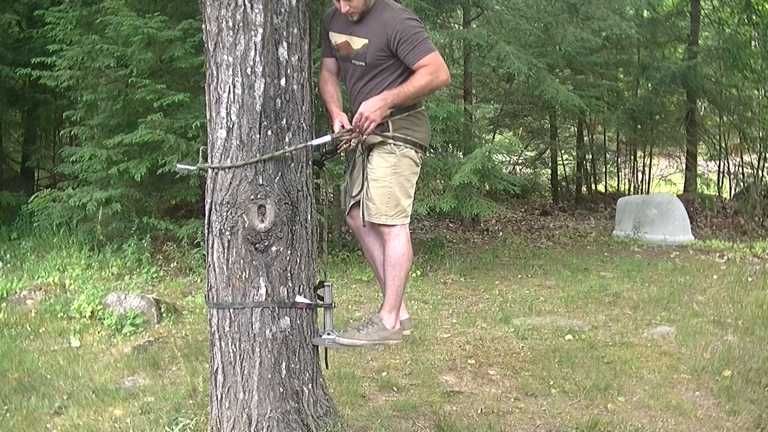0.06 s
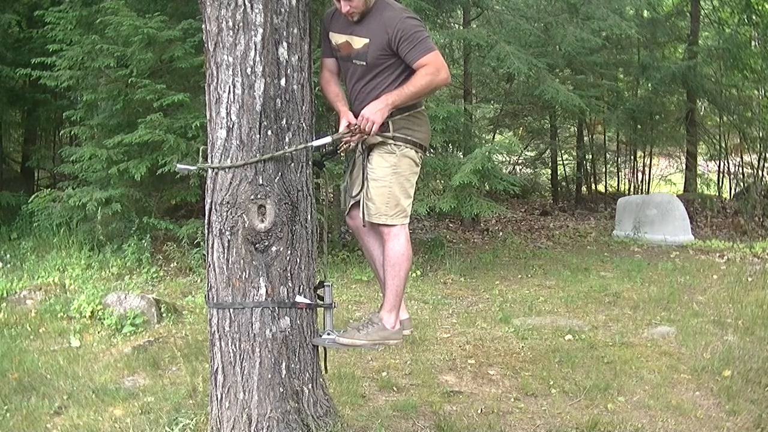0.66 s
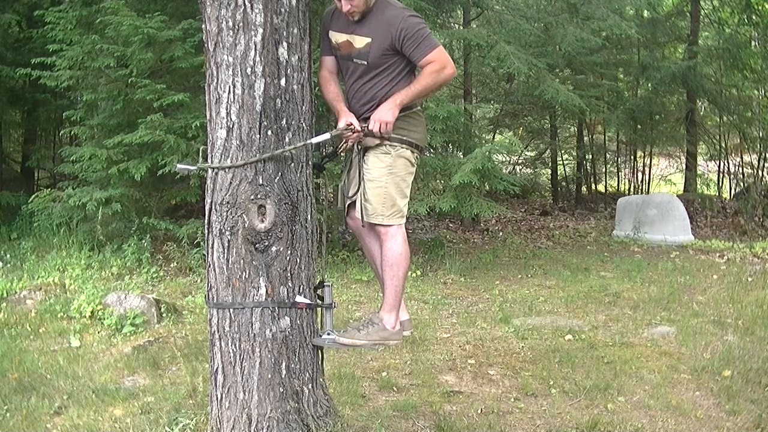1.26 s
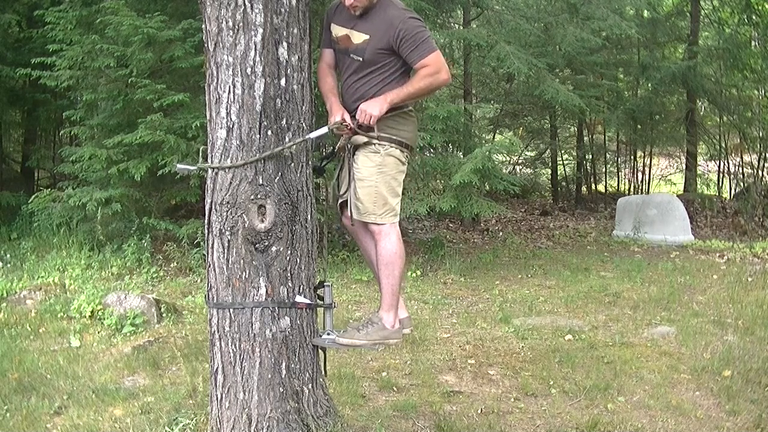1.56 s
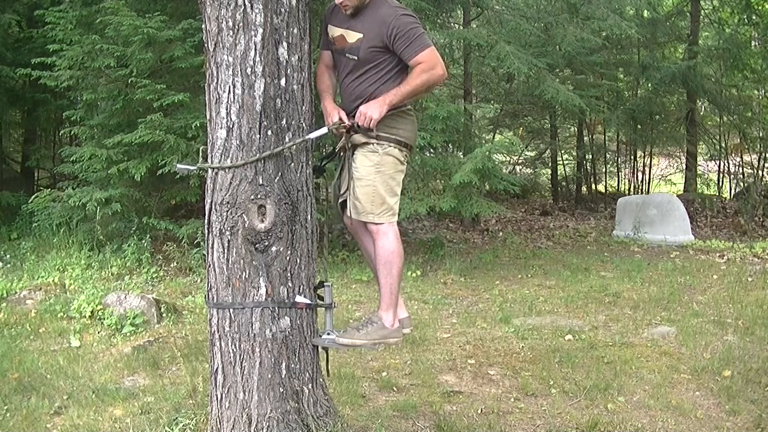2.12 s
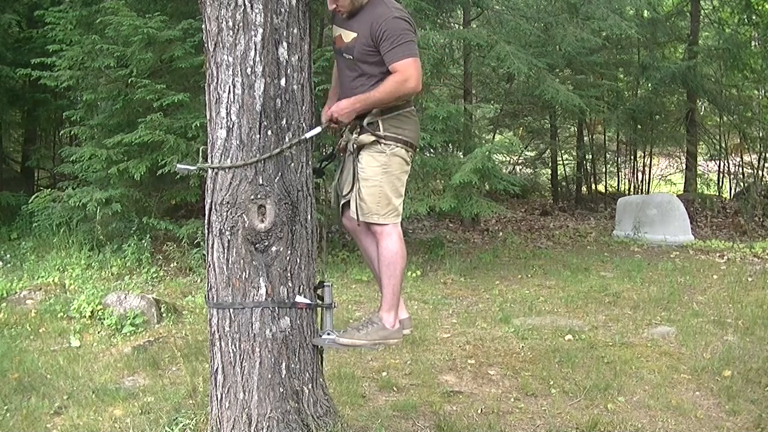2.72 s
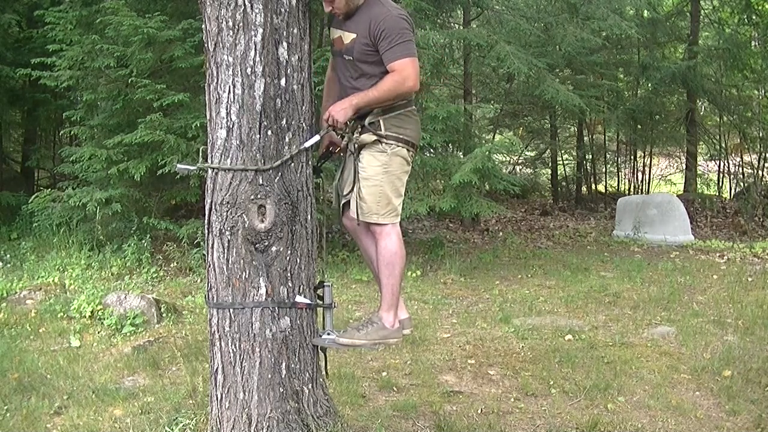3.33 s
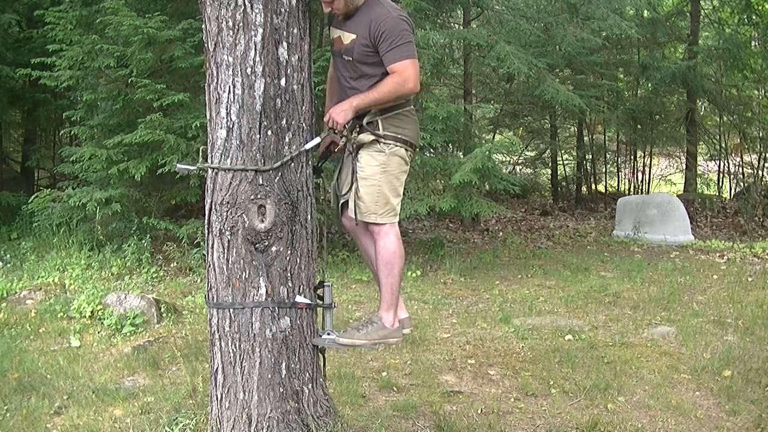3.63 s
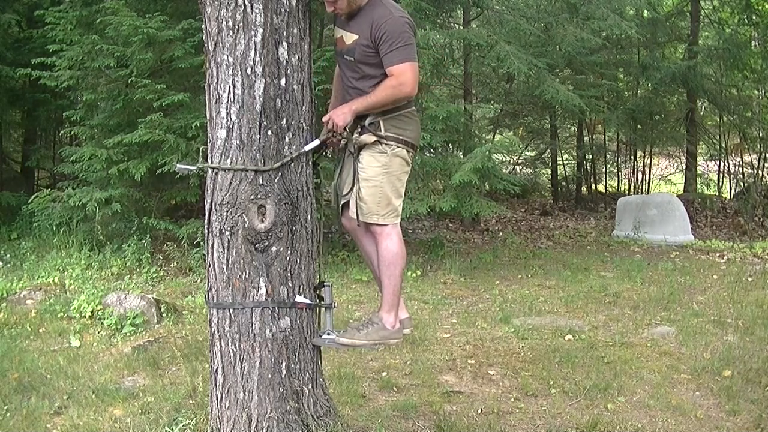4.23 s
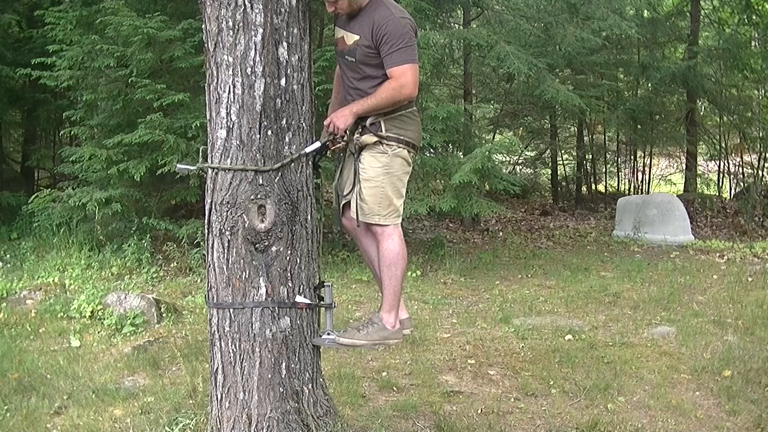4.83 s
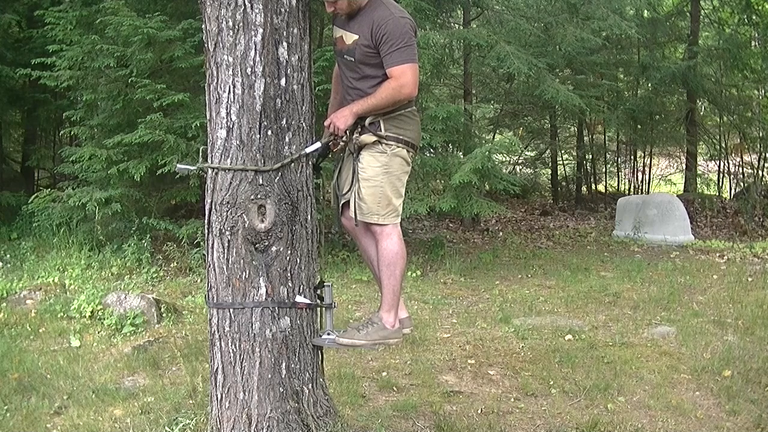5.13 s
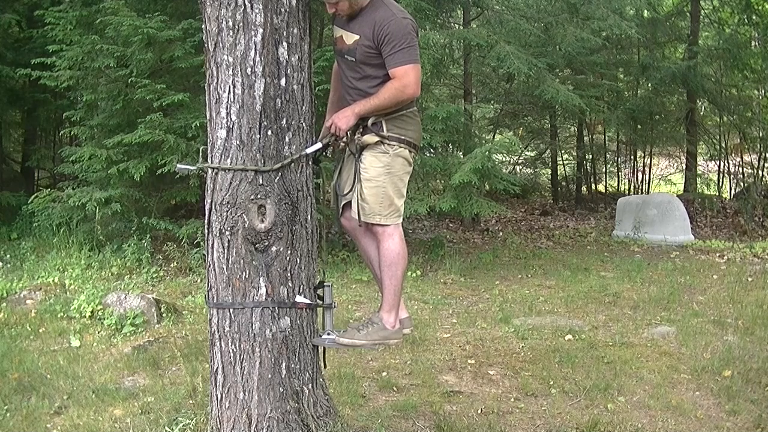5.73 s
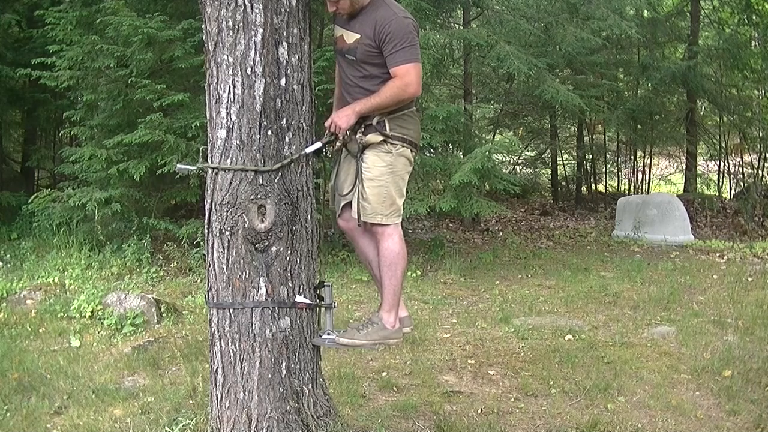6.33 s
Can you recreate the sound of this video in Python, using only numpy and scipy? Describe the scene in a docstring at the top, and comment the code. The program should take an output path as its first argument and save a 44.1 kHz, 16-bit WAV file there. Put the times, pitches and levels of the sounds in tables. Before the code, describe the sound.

A songbird whistles short phrases in quiet woods while nearby climbing gear clinks, rope rustles faintly and a carabiner snaps shut once.

```python
"""A songbird whistles short slurred phrases in the woods; the trees smear each one into a long tail.
Every syllable is one nearly pure tone arching in pitch. Nearby a climber handles a rope and harness:
fibres rustle, a knot creaks, buckles clink, and a carabiner's sprung gate snaps shut once.
Underneath lie a steady hush of air and the faint ticks of a camera's focus motor. A low rumble swells
now and then, partly around the motor's jolts, and there is one soft low thud."""
import sys
import numpy as np
from scipy import signal
from scipy.fft import rfft, irfft, next_fast_len
from scipy.io import wavfile

SR = 44100
rng = np.random.default_rng(int(sys.argv[2]) if len(sys.argv) > 2 else 0)


def inscribe(sig):
    """Save sig as 16-bit PCM at rate SR to the path in sys.argv[1].

    A 1-D sig is mono; a 2-D sig holds one channel per row.
    Samples are clipped to [-1, 1] before scaling.
    """
    pcm = np.round(np.clip(np.atleast_2d(sig).T, -1, 1) * 32767)
    wavfile.write(sys.argv[1], SR, pcm.astype(np.int16))


N = 285327
TIME = np.arange(N) / SR

# steady hush of air: frequency_hz, density_db
HUSH_COLOUR = [(15, -40), (25, -21), (70, -9.5), (117, -3.5), (180, -1.5), (293, -2), (775, -13),
               (863, -11.5), (1130, -14), (2410, -7), (2910, -6.5), (3720, -6), (5570, -12), (14800, -21),
               (16000, -38.5)]
# low rumble and thud: frequency_hz, density_db
RUMBLE_COLOUR = [(70, -20.5), (150, -3), (260, -1), (380, -2.5), (650, -31)]
# rumble swells, some around the motor's jolts, and the thud at 5.06 s: middle_s, level_db, half_length_s
RUMBLE_SWELLS = [(0.615, -71, .08), (1.65, -70, 0.21), (2.376, -73.5, 0.3), (3.667, -67, 0.16),
                 (5.06, -62.5, 0.066), (6.19, -69, 0.29)]
# stereo image of diffuse noise: frequency_hz, left_right_correlation
STEREO_LIKENESS = [(50, -0.34), (250, -0.26), (600, -0.43), (1200, -0.37), (3000, 0.27), (7000, 0.11),
                   (15000, 0.19)]
# stretches when the focus motor runs: start_s, end_s
MOTOR_RUNS = [(1.3895, 2.54), (6.028, 6.45)]
# jolts of the lens: start_s, relative_db
LENS_JOLTS = [(1.39, -58), (1.661, -52), (1.928, -54), (2.061, -51.5), (2.325, -51), (2.394, -52),
              (6.064, -54), (6.131, -52), (6.463, -50.5)]
# camera body answering a motor step: centre_hz, width_hz, gain_db
STEP_RESONANCES = [(474, 270, -3), (782, 64, 3.5), (1210, 360, -8.5), (1940, 52, 6.5)]
# camera body answering a jolt: centre_hz, width_hz, gain_db
JOLT_RESONANCES = [(248, 107, 13), (426, 47, -6), (617, 43, 11), (1040, 120, 2), (1260, 110, -3),
                   (1900, 70, 11)]
# rope sliding through the hands: time_s, relative_db
RUSTLE_ENVELOPE = [(0.0, -66), (1.3, -63.5), (1.96, -72), (2.43, -61), (2.94, -65), (3.37, -59.5),
                   (3.78, -66), (4.31, -62), (6.47, -78)]
# rubbing fibres: frequency_hz, density_db
FIBRE_COLOUR = [(1200, -4), (2200, 9), (3500, -13), (6500, 9), (9000, -3), (15000, -14)]
# rope creaking in its knot: start_s, level_db, pitch_hz, length_s
KNOT_CREAKS = [(3.995, -51.5, 2090, 0.0058), (4.171, -54, 2210, 0.011), (5.625, -60, 1950, 0.016),
               (5.9503, -49, 1940, 0.0071), (5.951, -54, 1530, 0.0046), (5.984, -53, 2030, .016)]
# dry crack of metal on metal: frequency_hz, density_db
CRACK_COLOUR = [(100, -40), (600, -26), (1250, -19), (2100, 3), (4000, 4), (8000, 6), (10000, -1.5),
                (13000, -5), (15500, -10)]
# buckles and links touching: start_s, crack_db, ring_db, rebound_db, main_mode_hz, second_mode_hz
BUCKLE_CLINKS = [(.091, -49, -39.5, -15, 2340, 2940), (.3866, -44, -49, -13, 8500, 5900),
                 (1.1552, -30.5, -24.5, -20, 4020, 3620), (3.9962, -34.5, -38, -12, 3900, 8050),
                 (4.1725, -42.5, -38.5, -10, 2170, 6170), (4.4141, -28.5, -37, -3.5, 7550, 4200),
                 (5.1129, -43, -47, -6, 6780, 4200), (5.1886, -31.5, -30, -11, 4450, 8400),
                 (5.214, -41.5, -42, -15, 7900, 4270), (6.3885, -41, -40, -12, 4300, 6750)]
# the carabiner's gate grazes, then slams home: start_s, crack_db, ring_db
GATE_HITS = [(2.3509, -27, -22.5), (2.356, -17, -17.5)]
# ring of the carabiner: pitch_hz, relative_db, t60_s
CARABINER_MODES = [(2050, -14.5, 0.0099), (3100, -19, 0.018), (4460, -3.5, 0.029), (4610, -1, 0.016),
                   (4530, -8, 0.03), (4990, -14.5, 0.038), (6600, -11, 0.023), (7340, 0.5, 0.036),
                   (7100, -29, 0.23), (7800, -9, 0.025), (8380, -7, 0.026), (9260, -17.5, 0.051),
                   (14600, -23, 0.054)]
# syllables of the song, one pitch arch each: crest_s, level_db, start_hz, crest_hz, end_hz, rise_s, fall_s
SYLLABLES = [(.194, -56, 3650, 4330, 2476, .05, 0.091), (.364, -49.5, 2480, 3834, 3230, .059, .042),
             (1.143, -58.5, 2700, 3990, 2375, .046, 0.055), (1.323, -53, 2600, 3527, 2503, .056, 0.025),
             (2.338, -61.5, 2900, 5290, 4250, .081, 0.089), (2.5, -55, 3390, 4790, 4710, .119, 0.029),
             (2.566, -53, 3350, 3360, 2570, .01, .018), (2.644, -52, 2650, 3300, 2420, .06, 0.03),
             (2.697, -61, 2506, 2600, 2270, .015, .02), (2.933, -60.5, 3200, 3230, 2530, .005, 0.068),
             (3.115, -61.5, 2400, 3005, 2210, .037, .035), (3.428, -54.5, 4100, 4100, 2613, .004, 0.053),
             (3.448, -66, 4300, 4980, 4400, .066, 0.044), (3.556, -51, 2650, 3766, 3026, .059, .025),
             (4.548, -57, 3750, 3760, 2900, .005, 0.048), (4.614, -55.5, 2606, 3740, 2410, .029, 0.058),
             (4.642, -63.5, 3730, 4250, 4220, .054, .014), (4.756, -54, 2650, 3105, 2550, .052, 0.028),
             (5.166, -61, 3510, 3580, 2230, .007, .082), (5.361, -61.5, 2250, 3390, 3340, .06, .015),
             (5.581, -63, 4830, 5980, 4570, .004, .027), (5.607, -56.5, 3700, 4136, 2817, .01, .03),
             (5.716, -60, 3150, 4950, 4600, .081, .01), (6.274, -55.5, 2550, 3610, 2840, .028, .013),
             (6.306, -58, 2746, 2890, 2320, .032, 0.038), (6.416, -57, 3600, 3660, 2480, .008, 0.026),
             (6.475, -51.5, 2500, 3400, 3300, .03, .01)]


def from_db(db):
    return 10 ** (np.asarray(db) / 20)


def unit_rms(x):
    return x / np.sqrt(np.mean(x ** 2) + 1e-20)


def at_hz(points, hz):
    """Reads a curve on a log-frequency axis."""
    knots_hz, values = np.transpose(points)
    return np.interp(np.log(hz + 1), np.log(knots_hz), values)


def drift(rate_hz):
    """A random modulator with a spread of about 1."""
    knots = rng.standard_normal(8000)
    return 1.2 * np.interp(TIME * rate_hz, np.arange(len(knots)), knots)


def coloured(x, spectrum, size=1024):
    """Minimum-phase EQ: no ring ahead of a hit, and white noise keeps its power."""
    gain = unit_rms(from_db(at_hz(spectrum, np.fft.rfftfreq(size, 1 / SR))))
    cepstrum = irfft(np.log(gain))
    cepstrum[1:size // 2] *= 2
    cepstrum[size // 2 + 1:] = 0
    return signal.fftconvolve(x, irfft(np.exp(rfft(cepstrum))))[:N]


def left_right(mid, side, alike):
    """Mid and side to stereo: alike = 1 is mono, 0 is wide."""
    return np.sqrt(1 + alike) * mid + np.sqrt(1 - alike) * side * [[1], [-1]]


def panned(x, left_db):
    return x * from_db(np.array([[left_db], [-left_db]]) / 2)


def stereo_noise(spectrum):
    """A diffuse bed of coloured noise at rms 1."""
    size = next_fast_len(N)
    hz = np.fft.rfftfreq(size, 1 / SR)
    mid, side = rfft(rng.standard_normal((2, size)))
    white = left_right(mid, side, at_hz(STEREO_LIKENESS, hz))
    return unit_rms(irfft(white * from_db(at_hz(spectrum, hz)), size)[:, :N])


def resonances(x, modes):
    """A resonant body as parallel band-passes."""
    return sum(from_db(db) * signal.lfilter(*signal.iirpeak(hz, hz / width_hz, SR), x)
               for hz, width_hz, db in modes)


def clicks(rows):
    """One impulse for each start_s, level_db."""
    out = np.zeros(N)
    for start_s, db in rows:
        out[min(round(start_s * SR), N - 1)] += from_db(db)
    return out


def chafe(hits, t60_s):
    """Each hit sets off a short dying burst of noise."""
    envelope = signal.lfilter([1], [1, -from_db(-60 / (t60_s * SR))], hits + 1e-18)
    return envelope * rng.standard_normal(N)


def struck(modes, contact_s=0.00045):
    """Struck metal: its modes swell during the contact, then ring out."""
    t = TIME[:SR // 2]
    ring = sum(from_db(db - 60 * t / t60_s) * np.sin(2 * np.pi * (hz * t + rng.random()))
               for hz, db, t60_s in modes)
    return ring * (1 - np.exp(-t / contact_s))


def add(out, start_s, sound):
    part = out[round(start_s * SR):][:len(sound)]
    part += sound[:len(part)]


def scatter(x, t60_s, build_s, alike):
    """Forest reverb at unit power: echoes off trunks, leaves and ground build up and die away."""
    t = TIME[:SR * 3 // 2]
    mid, side = rng.standard_normal((2, len(t)))
    echoes = left_right(mid, side, alike) * (1 - np.exp(-t / build_s)) * from_db(-60 * t / t60_s)
    echoes /= np.sqrt(np.sum(echoes ** 2) / 2)
    return signal.fftconvolve(x[None], echoes, axes=1)[:, :N]


def air(level_db=-57):
    """The bed: a steady hush of air and leaves."""
    return from_db(level_db) * stereo_noise(HUSH_COLOUR)


def low_rumble(floor_db=-69):
    """Low noise swells, partly around the focus motor's jolts; its shortest swell is a soft thud."""
    swells = sum(from_db(db) * np.exp(-((TIME - middle_s) / half_s) ** 2)
                 for middle_s, db, half_s in RUMBLE_SWELLS)
    return (from_db(floor_db) + swells) * stereo_noise(RUMBLE_COLOUR)


def focus_motor(step_rate_hz=29.97, tap_db=-27.5, hiss_db=-42, jolt_gain_db=12):
    """The lens ticks along in even steps and now and then jolts; both ring the camera body."""
    steps = clicks((s, 0) for start_s, end_s in MOTOR_RUNS
                   for s in np.arange(start_s, end_s, 1 / step_rate_hz))
    jolts = from_db(jolt_gain_db) * clicks(LENS_JOLTS)
    channels = []
    for _ in range(2):   # the taps sit in the centre; each side has its own noise
        ticks = from_db(tap_db) * steps + from_db(hiss_db) * chafe(steps, t60_s=0.024)
        knocks = chafe(jolts, t60_s=0.045)
        channels.append(resonances(ticks, STEP_RESONANCES) + resonances(knocks, JOLT_RESONANCES))
    return np.array(channels)


def rope_rustle(trim_db=-8.5, grain_db=3.5):
    """Rope fibres and cloth rub in uneven clumps."""
    envelope_db = np.interp(TIME, *np.transpose(RUSTLE_ENVELOPE))
    return from_db(envelope_db + trim_db + grain_db * drift(150)) * stereo_noise(FIBRE_COLOUR)


def knot_creaks(sag=0.018, roughness=0.037):
    """The tight rope slips in short, rough squeaks that sink slightly in pitch."""
    out = np.zeros(N)
    wobble = 1 + roughness * drift(600)
    for start_s, db, hz, length_s in KNOT_CREAKS:
        progress = (TIME - start_s) / length_s
        span = (progress > 0) & (progress < 1)
        pitch_hz = hz * (1 - sag * (progress[span] - .5)) * wobble[span]
        envelope = from_db(db) * np.sin(np.pi * progress[span])
        out[span] += envelope * np.sin(2 * np.pi * np.cumsum(pitch_hz) / SR)
    return out


def buckle_clinks(rebound_s=0.0035, ring_t60_s=0.0066, second_mode_db=-4, chafe_db=-9):
    """Small metal parts, damped by the hand, touch, rebound once and ring briefly in two modes."""
    touches = [(start_s + delay_s, crack_db + drop_db, ring_db + drop_db, main_hz, second_hz)
               for start_s, crack_db, ring_db, rebound_db, main_hz, second_hz in BUCKLE_CLINKS
               for delay_s, drop_db in ((0, 0), (rebound_s, rebound_db))]
    hits = clicks(touch[:2] for touch in touches)
    out = coloured(hits + from_db(chafe_db) * chafe(hits, t60_s=0.016), CRACK_COLOUR)
    for start_s, _, ring_db, main_hz, second_hz in touches:
        modes = [(main_hz, ring_db, ring_t60_s), (second_hz, ring_db + second_mode_db, ring_t60_s)]
        add(out, start_s, struck(modes))
    return out


def carabiner_snap(click_db=9, chafe_db=-3):
    """The sprung gate hits the carabiner: a gritty crack and a bright metal ring."""
    hits = clicks(hit[:2] for hit in GATE_HITS)
    crack = from_db(click_db) * hits + from_db(chafe_db) * chafe(hits, t60_s=.014)
    out = coloured(crack, CRACK_COLOUR)
    for start_s, _, ring_db in GATE_HITS:
        add(out, start_s, from_db(ring_db) * struck(CARABINER_MODES))
    return out


def whistle(syllable, attack_s=.018, release_s=0.0099, ease=.85, tremble=0.011, ends_lift_db=1.5):
    """One nearly pure tone slurs up to a round crest and down again, with a slight tremble."""
    crest_s, db, start_hz, crest_hz, end_hz, rise_s, fall_s = syllable
    span = (TIME > crest_s - rise_s) & (TIME < crest_s + fall_s + release_s)
    t = TIME[span] - crest_s
    turn = np.pi / 2 * ease   # at ease = 1 the slur levels out fully at its low ends
    from_crest = np.clip([-t / rise_s, t / fall_s], 0, 1)
    to_start, to_end = (np.sin(turn * from_crest) / np.sin(turn)) ** 2
    arch_hz = crest_hz + (start_hz - crest_hz) * to_start + (end_hz - crest_hz) * to_end
    pitch_hz = arch_hz * (1 + tremble * drift(300)[span])
    envelope = np.clip(np.minimum((t + rise_s) / attack_s, 1 - (t - fall_s) / release_s), 0, 1)
    amplitude = np.sqrt(2) * from_db(db + ends_lift_db * (to_start + to_end))
    out = np.zeros(N)
    out[span] = envelope * amplitude * np.sin(2 * np.pi * np.cumsum(pitch_hz) / SR)
    return out


def songbird(flutter_db=1.5, far_db=-72, near_db=-55):
    """The song arrives directly, off nearby foliage and as a long tail from deep in the woods."""
    flutter = from_db(flutter_db * drift(120))
    notes = [whistle(syllable) * flutter for syllable in SYLLABLES]
    # faint notes come from farther off, so less of them arrives by the short paths
    nearness = [np.interp(db, [far_db, near_db], [0, 1]) for _, db, *_ in SYLLABLES]
    close = sum(share * note for share, note in zip(nearness, notes))
    foliage = from_db(-0.5) * scatter(close, t60_s=0.05, build_s=0.0053, alike=0.97)
    woods = from_db(1.13) * scatter(sum(notes), t60_s=0.95, build_s=0.0042, alike=0.58)
    return panned(from_db(-3) * close + foliage + woods, left_db=2.5)


def scene():
    """The mix: climbing gear with echoes off trunk, body and ground, the bird, and the quiet layers."""
    gear = carabiner_snap() + buckle_clinks() + knot_creaks()
    early_echoes = from_db(-3) * scatter(gear, t60_s=0.097, build_s=0.0008, alike=0.15)
    tail = from_db(-11.5) * scatter(gear, t60_s=0.42, build_s=0.0025, alike=0.5)
    climber = panned(gear + early_echoes + tail, left_db=0.5)
    return climber + songbird() + rope_rustle() + focus_motor() + air() + low_rumble()


def record(dry):
    """A steep low-pass takes off the top above 16 kHz."""
    return signal.sosfilt(signal.ellip(10, .2, 70, 16000, fs=SR, output="sos"), dry)


dry = scene()
out = record(dry)
inscribe(out)
```